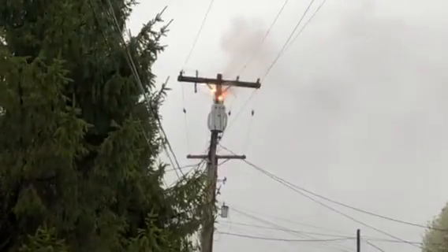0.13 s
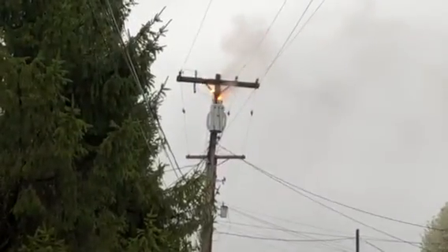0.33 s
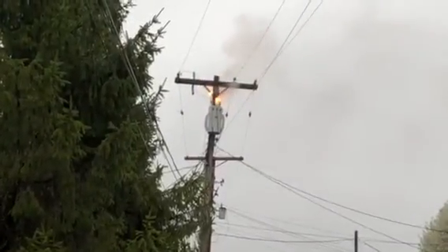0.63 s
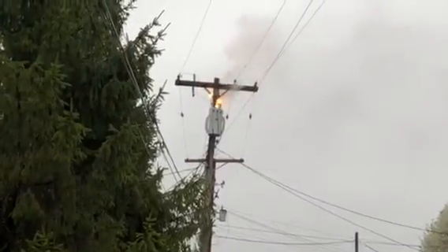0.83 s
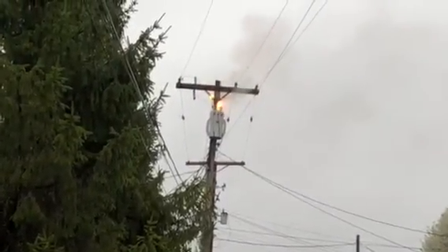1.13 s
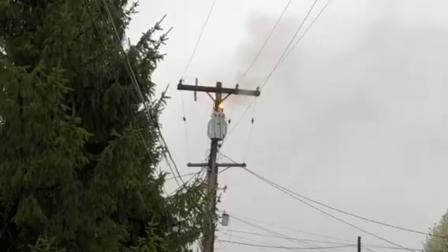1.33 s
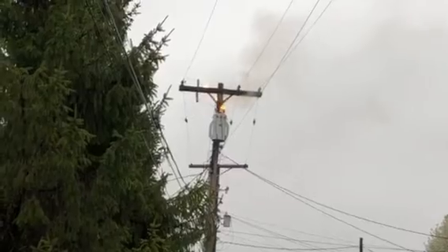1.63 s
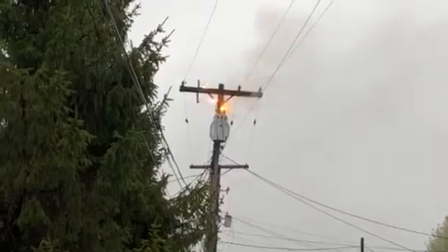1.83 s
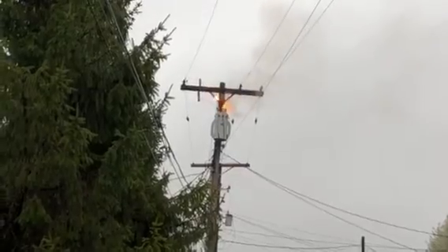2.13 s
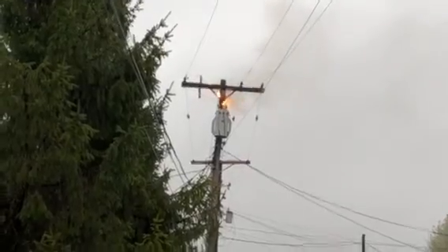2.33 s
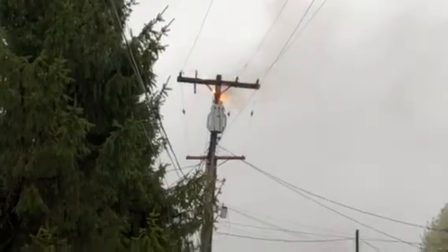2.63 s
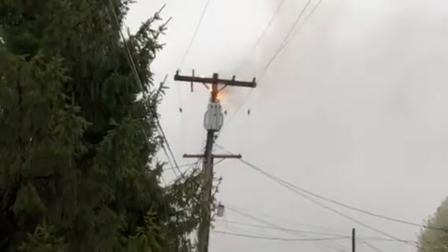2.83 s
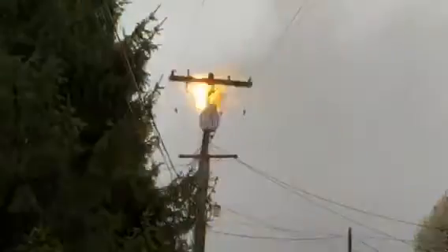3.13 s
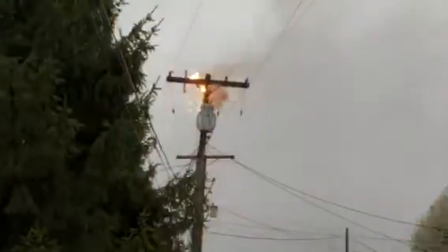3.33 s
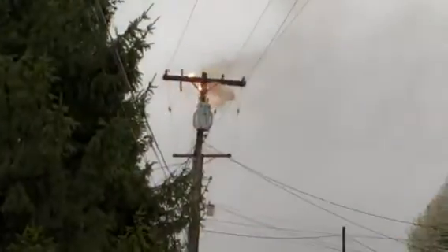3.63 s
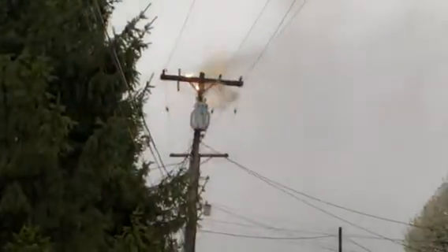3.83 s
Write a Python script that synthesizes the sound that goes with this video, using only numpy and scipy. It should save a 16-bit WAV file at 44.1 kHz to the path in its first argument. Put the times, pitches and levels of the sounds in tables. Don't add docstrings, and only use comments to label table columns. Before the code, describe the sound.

Three loud electrical bangs from a sparking transformer, with faint ticks and sizzles between and rolling echoes; the last becomes a buzzing arc. Faint birds and distant traffic, phone microphone outdoors at a distance.

```python
import sys
import numpy as np
from scipy import signal
from scipy.fft import rfft, irfft
from scipy.io import wavfile
from scipy.ndimage import uniform_filter1d

SR = 44100
rng = np.random.default_rng(int(sys.argv[2]) if len(sys.argv) > 2 else 0)


def dump(signal):
    limited = np.clip(np.atleast_2d(signal).T, -1, 1)
    pcm = np.round(limited * 32767).astype(np.int16)
    wavfile.write(sys.argv[1], SR, pcm)


def natural_amplitude(level_db):
    exponent = np.asarray(level_db, float) / 20
    return 10 ** exponent


N = 176400
EDGE_HZ = 15780


def evened(x):
    return x / np.sqrt(np.mean(x ** 2) + 1e-20)


def read(points, hz):
    f, value = np.transpose(points)
    return np.interp(np.log(hz + 1), np.log(f + 1), value)


def add(mix, s, sound):
    part = mix[round(s * SR):][:len(sound)]
    part += sound[:len(part)]


def band(x, low_hz, top_hz):
    edges = [max(low_hz, 10), min(top_hz, SR / 2 - 500)]
    return signal.sosfilt(signal.butter(2, edges, "band", fs=SR, output="sos"), x)


def slow_noise(samples):
    return evened(signal.oaconvolve(rng.standard_normal(N), np.hanning(samples), "same"))


def field(frames, level_db, patch_db):
    hz = np.fft.rfftfreq(512, 1 / SR)[:, None]
    t = np.arange(frames) * 128 / SR
    real, imag, patches = rng.standard_normal((3, 257, frames))
    patches = uniform_filter1d(patches, size=6, axis=0)
    patches = evened(uniform_filter1d(patches, size=8, axis=1))
    level = natural_amplitude(level_db(hz, t) + patch_db * patches) * (hz < EDGE_HZ)
    return signal.istft((real + 1j * imag) * level, nperseg=512, noverlap=384)[1]


def burst(length):
    u = np.linspace(0, 1, num=max(round(length * SR), 8))
    return rng.standard_normal(len(u)) * u ** 0.7 * np.sqrt(1 - u ** 4)


def echo(length):
    u = np.linspace(0, 1, num=max(round(1.48 * length * SR), 8))
    puff = rng.standard_normal(len(u)) * np.sin(np.pi * np.sqrt(u)) ** 2
    return np.r_[puff, np.zeros(200)]


# (t/s, length/s, crack level/dB, push level/dB, top f/Hz)
SPARK_EVENTS = [(0.2796, 0.0074, -5, -16, 9000), (1.9065, 0.0014, -19.5, -29, 9000),
                (1.9227, 0.001, -30, -34, 16000), (1.9327, 0.021, -25.5, -64, 9000),
                (1.9472, 0.00048, 5.5, -15, 17900), (2.522, 0.0052, -17, -45, 9000),
                (3.1895, 0.0052, -36, -37, 7000), (3.204, 0.011, -8.5, -14, 6250),
                (3.2127, 0.0081, -5.5, -42, 18000), (1.9582, 0.0054, -39, -12, 2997),
                (3.2325, 0.0058, -9, -15, 11800), (3.254, 0.0061, -8, -37, 15800),
                (3.2702, 0.0067, -10, -18, 9900), (3.281, .006, -14, -11, 6900)]


def sparks():
    cracks, pushes = np.zeros((2, N))
    for s, length, crack_db, push_db, top_hz in SPARK_EVENTS:
        crack = band(np.r_[burst(length), np.zeros(200)], 71.6, top_hz)
        add(cracks, s, natural_amplitude(crack_db) * crack)
        add(pushes, s, natural_amplitude(push_db) * np.hanning(round(length * SR) + 60))
    return cracks, pushes


# (t/s, length/s, level/dB, low f/Hz, steady roar level/dB re spits)
SIZZLE_RUNS = [
    (0.824, 0.039, -47, 4000, -24),
    (1.245, 0.031, -46.5, 2010, -21),
    (1.278, .015, -42.5, 242, -15),
    (3.047, .035, -48.5, 2970, -22),
    (3.2229, 0.067, -17, 100, -5),
]


def sizzles():
    half_cycles_hz, spit_s, spit_spread_db = 120, 0.005, 3
    out = np.zeros(N)
    t = np.arange(5000) / SR
    for s, length, db, low_hz, roar_db in SIZZLE_RUNS:
        run = natural_amplitude(db + roar_db) * rng.standard_normal(len(t)) * (t < length)
        for at in np.arange(0, length, 1 / half_cycles_hz):
            spit_db = db + spit_spread_db * rng.standard_normal()
            add(run, at, natural_amplitude(spit_db) * burst(spit_s))
        swell = np.sin(np.pi * np.clip((t + spit_s) / (length + 3 * spit_s), 0, 1))
        add(out, s, band(run * swell, low_hz, 12900))
    return out


# (f/Hz, level/dB)
CRACK_COLOUR = [(120, -61.5), (200, 6.5), (1740, -7.5), (3690, -17.5), (4600, -11), (8740, -20.5),
                (15100, -20.5), (16000, -60.5)]


def arrival():
    lag_cycles, ground_s, ground_db = 0.9, 0.0031, -3.5
    smear_s, smear_db = 0.0085, -17
    hz = np.fft.rfftfreq(8192, 1 / SR) + 5
    t = np.arange(8192) / SR
    lag = np.exp(-2j * np.pi * lag_cycles * np.log(hz / hz[-1]))
    ground = 1 + natural_amplitude(ground_db) * np.exp(-2j * np.pi * hz * ground_s)
    smear = rng.standard_normal(len(t)) * np.exp(-t / smear_s)
    paths = ground + natural_amplitude(smear_db) * rfft(smear / np.linalg.norm(smear))
    colour = natural_amplitude(read(CRACK_COLOUR, hz)) * lag
    full = irfft(colour * paths)[:4096]
    bare = irfft(colour)[:4096]
    return full / np.linalg.norm(full), bare / np.linalg.norm(bare), irfft(lag * ground)[:4096]


# (t/s, length/s, level/dB, low
# f/Hz, top f/Hz)
WALL_SLAPS = [(0.319, 0.0061, -24, 790, 7100), (0.368, 0.0072, -24, 2480, 7150),
              (0.562, 0.0038, -36.5, 2942, 5900), (0.722, 0.0058, -44.5, 303, 2000),
              (0.7903, 0.011, -39.5, 586, 3160), (1.962, 0.025, -16.5, 150, 8000),
              (1.984, 0.0041, -5.5, 880, 7000), (2, 0.0069, -20.5, 196, 4960),
              (2.272, 0.006, -30, 506, 4000), (2.428, 0.0033, -31.5, 910, 2170),
              (2.441, 0.0032, -28, 890, 3400), (2.46, 0.0024, -21.5, 500, 3200),
              (2.56, 0.0058, -24.5, 3300, 9100), (2.561, 0.0035, -35.5, 1100, 1600),
              (2.7, .005, -38, 4600, 5900), (2.655, 0.015, -40, 4500, 7000),
              (1.969, 0.0043, -11.5, 300, 6000), (1.989, 0.0034, -19.5, 148, 910),
              (0.409, .006, -32, 1100, 2200), (1.982, 0.0069, -11.5, 1120, 1670),
              (3.209, 0.0057, -12.5, 434, 910), (3.215, 0.0061, -3, 4400, 8100),
              (2.54, 0.14, -42.5, 4800, 5600), (0.43, .02, -42, 60, 130), (1.907, .007, -36, 246, 597),
              (1.94, .008, -31, 2000, 3300), (3.311, 0.0336, -30, 222, 276),
              (0.29, 0.011, -28, 2500, 15000), (2.011, .17, -32.5, 1300, 1800),
              (2.051, .15, -37.5, 149, 257), (3.287, 0.046, -27, 4000, 15000),
              (2.611, 0.0087, -30.5, 1950, 6940), (2.687, 0.0062, -34, 4120, 6000),
              (2.803, 0.0027, -44, 3000, 5900), (3.245, 0.0036, -3, 2530, 6900),
              (3.382, 0.013, -23.5, 3050, 6600), (3.496, 0.007, -36, 3020, 8200),
              (3.681, 0.0074, -38, 2000, 6100), (3.7164, 0.023, -35, 376, 2250)]


def slaps():
    out = np.zeros(N)
    for s, length, db, low_hz, top_hz in WALL_SLAPS:
        slap = band(band(echo(length), low_hz, top_hz), low_hz, top_hz)
        add(out, s, natural_amplitude(db - 15.5) * evened(slap))
    return out


# (t/s, level/dB)
STRAY_TICKS = [(0.263, -56), (1.077, -57), (1.438, -57.5), (1.462, -51), (1.6111, -61), (1.6203, -56),
               (1.6376, -52), (1.6958, -46), (1.729, -50), (1.761, -54), (1.7857, -61)]


def ticks():
    ticks_per_s, tick_db, lift_db = 24, -54, 2
    out = (rng.random(N) < ticks_per_s / SR) * natural_amplitude(tick_db + 10.0 * rng.random(N))
    for s, db in STRAY_TICKS:
        add(out, s, natural_amplitude(db + lift_db) * echo(0.0017))
    return band(out, 7000, 18000)


# (f/Hz, level/dB)
ROLL_COLOUR = [(21, -30), (35, 8), (222, -5.5), (684, -10.5), (778, -13.5), (1400, -13.5), (2530, -19.5),
               (6360, -19), (16000, -31.5)]
# (f/Hz, T60/s)
ROLL_DECAY = [(60, 0.9), (160, 0.82), (420, 0.69), (1100, 0.89), (2900, 0.8), (7700, 0.32), (14000, 0.2)]


def roll(db, bass_db, treble_db, air_db, stretch):
    wait_s, rise_s = 0.016, 0.0076
    late_db, late_stretch = -12.5, 2.55
    bass_edge_hz, treble_hz, treble_octaves, air_hz = 310, 5340, 0.66, 9000

    def level_db(hz, t):
        fall = -60 * t / (read(ROLL_DECAY, hz) * stretch)
        decay = 10 * np.log10(natural_amplitude(2 * fall) + natural_amplitude(2 * (late_db + fall / late_stretch)))
        bass = bass_db / (1 + (hz / bass_edge_hz) ** 2)
        octaves = np.log2((hz + 1) / treble_hz)
        treble = treble_db * np.exp(-(octaves / treble_octaves) ** 2)
        air = air_db / (1 + (air_hz / (hz + 1)) ** 4)
        return read(ROLL_COLOUR, hz) + bass + treble + air + decay

    tail = field(800, level_db, 1.8)
    t = np.arange(len(tail)) / SR
    return natural_amplitude(db) * tail / tail[:4410].std() * np.clip((t - wait_s) / rise_s, 0, 1)


# (t/s, level/dB, extra bass/dB, extra treble/dB, extra air/dB, decay stretch)
ROLL_EVENTS = [
    (0.2809, -31.5, 4, 2, 5, 1.31),
    (1.907, -48, -3, -1, 4, 0.69),
    (1.9465, -23, -4.5, -3.5, -2, 1.257),
    (2.5234, -46.5, -9, 3, -0.5, 1.84),
    (3.2049, -26, -3, -1, 0.5, 0.92),
    (3.25, -24, 3.5, 0, 4, 1.335),
    (1.28, -60.5, 8, 6.5, 7, 0.72),
]


def rolls():
    out = np.zeros(N)
    for s, *shape in ROLL_EVENTS:
        add(out, s, roll(*shape))
    return out


def transformer():
    full, bare, lag = arrival()
    cracks, pushes = sparks()
    direct = signal.oaconvolve(cracks + sizzles(), full)[:N]
    side = signal.oaconvolve(slaps() + ticks(), bare)[:N]
    pushes = band(signal.oaconvolve(pushes, lag)[:N], 54.3, 342)
    return rolls() + direct + side + 2 * pushes


# (t/s, level/dB)
ARC_LEVEL = [(3.217, -41), (3.23, -14.5), (3.275, -14.5), (3.296, -13.5), (3.33, -31.5), (3.376, -18.5),
             (3.42, -21), (3.455, -30.5), (3.515, -28), (3.56, -30), (3.666, -45), (3.699, -52),
             (3.778, -42), (3.86, -37.5), (4.0, -51.5)]
# (multiple of hum rate, level/dB, fade/(dB/s))
ARC_PARTIALS = [
    (.52, -4.5, -14),
    (1, -1.5, -0.5),
    (2, -9.5, -19.5),
    (3, -13, -58),
    (5, -16, -62),
]


def hum():
    hum_hz, wobble_hz, idle_db = 121.5, 1.2, -67.5
    lump_db, lump_s = 3.5, 0.068
    window = round(lump_s * SR)
    t = np.arange(N) / SR
    s, db = np.transpose(ARC_LEVEL)
    level_db = np.interp(t, s, db, left=-120)
    since = np.maximum(t - s[0], 0)
    lumpy = lump_db * np.clip(since / 0.12, 0, 1)
    out = np.zeros(N)
    for k, part_db, fade in ARC_PARTIALS:
        turns = np.cumsum(k * hum_hz + wobble_hz * slow_noise(window)) / SR + rng.random()
        lumps = lumpy * slow_noise(window) / (2 if k == 1 else 1)
        out += natural_amplitude(level_db + part_db + fade * since + lumps) * np.cos(2 * np.pi * turns)
    idle_level = natural_amplitude(idle_db + 2.4 * slow_noise(window))
    idle = idle_level * np.cos(2 * np.pi * hum_hz * t + 2 * slow_noise(window))
    return np.sqrt(2) * (out + idle)


# (t/s, length/s, level/dB, pitch f/Hz, final drop f/Hz)
BIRD_NOTES = [(.012, .106, -64, 4000, 995), (0.43, 0.052, -54, 4000, 6), (0.81, .1, -62, 4000, 1008),
              (.965, 0.066, -67.5, 7270, 11), (1.165, 0.041, -68, 6100, 2.5), (1.295, .03, -69, 7270, -2),
              (1.31, 0.12, -70.5, 6840, 0), (1.8, 0.14, -82, 6850, 7), (1.34, .24, -84, 6400, 3),
              (1.22, 0.11, -80, 6100, 2), (1.59, 0.13, -77, 7300, -9), (1.74, 0.22, -85, 7140, -3.5),
              (1.605, 0.047, -72.5, 3800, 302), (1.846, 0.08, -72.5, 3200, 197),
              (0.258, 0.034, -63, 3140, -0.5), (1.475, 0.028, -69, 3200, 17)]


def birds():
    edge_s, drop_s, drop_db = 0.02, 0.03, -2
    quaver_db, wet_db, t60_s = 3, -4, 0.92
    out = np.zeros(N)
    for s, length, db, hz, drop_hz in BIRD_NOTES:
        u = np.arange(0, length, 1 / SR)
        fall = np.clip((u - length + drop_s) / drop_s, 0, 1)
        pitch = hz - drop_hz * np.sin(np.pi / 2 * fall) ** 2
        edge = np.clip(np.minimum(u, 4 * (length - u)) / edge_s, 0, 1)
        whistle = np.sqrt(2) * edge * np.sin(2 * np.pi * np.cumsum(pitch) / SR)
        add(out, s, natural_amplitude(db + drop_db * fall) * whistle)
    out = out * natural_amplitude(quaver_db * slow_noise(900))
    tail = rng.standard_normal(SR) * natural_amplitude(-60 * np.arange(SR) / SR / t60_s)
    return out + natural_amplitude(wet_db) * signal.oaconvolve(out, tail / np.linalg.norm(tail))[:N]


# (f/Hz, level/dB)
FLOOR_COLOUR = [(18, -31), (30, 10.5), (112, -2.5), (328, -5.5), (988, -7.5), (3220, -19), (7870, -29.5),
                (14800, -36), (16000, -33)]


def floor():
    noise = field(N // 128 + 5, lambda hz, t: read(FLOOR_COLOUR, hz) + 0 * t, 1.0)
    return natural_amplitude(-60) * evened(noise[:N])


def scene():
    return (transformer() + hum() + birds() + floor())[None]


def low_pass(x):
    return signal.sosfilt(signal.butter(12, 16970, fs=SR, output="sos"), x)


def record(dry):
    ceiling = natural_amplitude(-2.6)
    bass_cut = signal.butter(3, 54, "high", fs=SR, output="sos")
    x = signal.sosfilt(bass_cut, dry) / ceiling
    x = x / (1 + x ** 4) ** (1 / 4)
    treble_cut = signal.firwin(101, EDGE_HZ + 450, fs=SR)[None]
    x = signal.oaconvolve(x, treble_cut, "same")
    return low_pass(ceiling * x)


dry = scene()
out = record(dry)
dump(out)
```